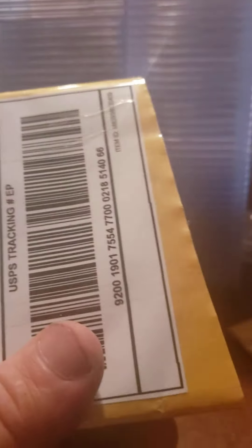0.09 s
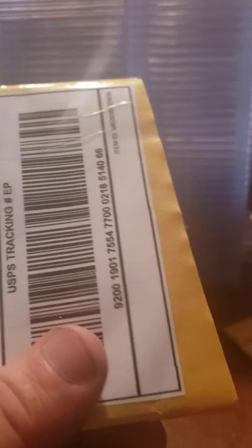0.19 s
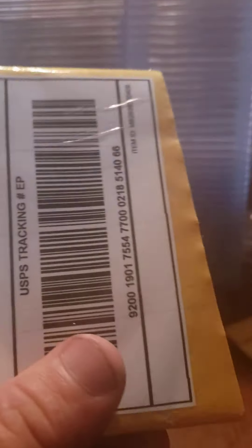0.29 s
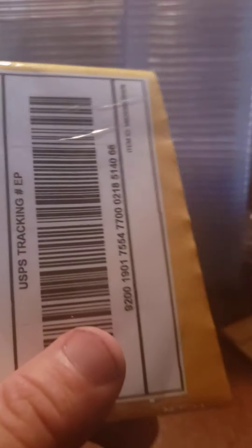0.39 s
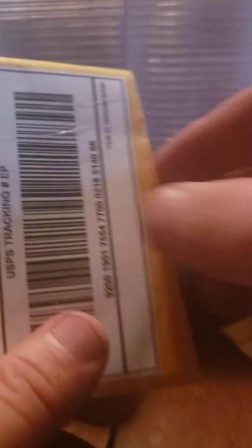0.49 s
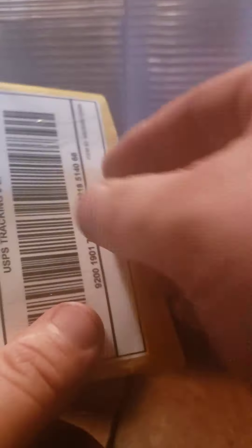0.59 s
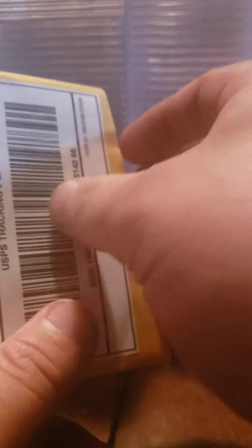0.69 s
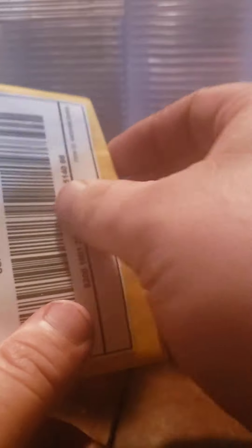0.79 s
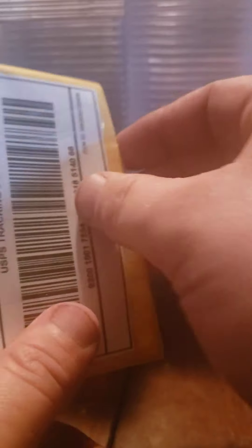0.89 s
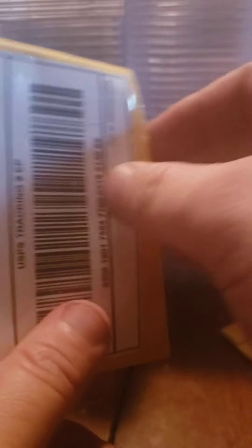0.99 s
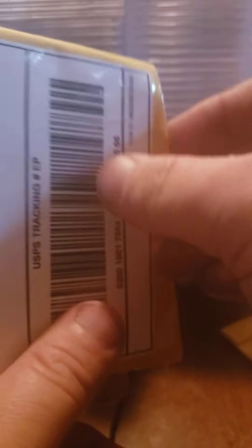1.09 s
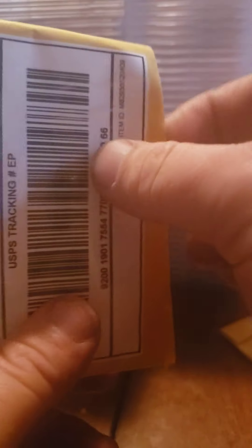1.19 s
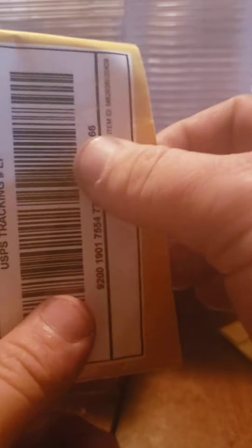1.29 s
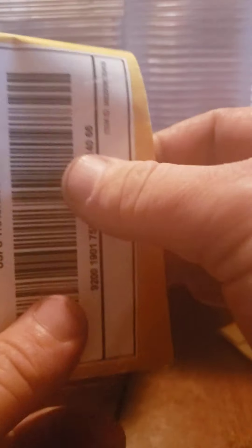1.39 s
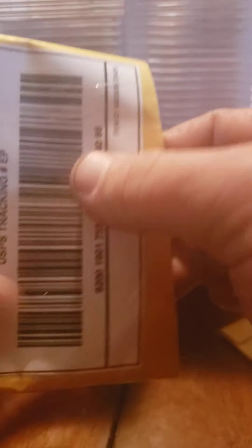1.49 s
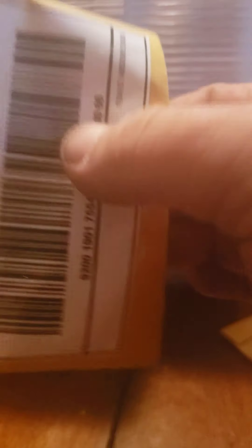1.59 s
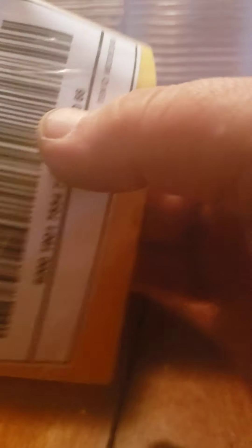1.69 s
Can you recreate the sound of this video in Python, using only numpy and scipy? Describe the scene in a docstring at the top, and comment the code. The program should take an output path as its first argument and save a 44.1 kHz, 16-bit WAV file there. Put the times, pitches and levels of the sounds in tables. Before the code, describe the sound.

Paper crinkles and ticks as hands work a padded envelope open near the microphone. Just before that, something hard is set on a table with a loud double snap and brief rattle in a quiet room.

```python
"""A padded paper envelope is pulled open by hand, close to the microphone in a small quiet room.
The paper rubs and crinkles, fibres tick, and the sheet buckles with soft low pops.
Just before, at the same close range, a hard object (perhaps the cutter) is put down on the table:
a light click, a double snap and a short rattle. Faint room tone lies behind it all."""
import sys
import numpy as np
from scipy import signal
from scipy.fft import rfft, irfft
from scipy.io import wavfile
from scipy.ndimage import uniform_filter1d

SR = 44100
rng = np.random.default_rng(int(sys.argv[2]) if len(sys.argv) > 2 else 0)


def store_wav(level_fs):
    """Save 16-bit WAV to argv[1]."""
    pcm = np.round(np.clip(np.atleast_2d(level_fs), -1, 1) * 32767)
    wavfile.write(sys.argv[1], SR, pcm.T.astype(np.int16))


N = 74970
TIME = np.arange(N) / SR
OBJECT_LAG_S, PAPER_LAG_S = .00025, -.000079  # left channel behind right: object right, paper left


def undb(db):
    """Decibels to amplitude."""
    return 10 ** (np.asarray(db) / 20)


def unit(x):
    """Scale to rms 1."""
    return x / np.sqrt(np.mean(x ** 2))


def fade(t, t60):
    """Decay by 60 dB in t60 seconds."""
    return np.exp(-np.log(1000) * t / t60)


def butter(x, hz, kind):
    """Second-order low or high pass."""
    return signal.sosfilt(signal.butter(2, hz, kind, fs=SR, output="sos"), x)


def convolve(x, response):
    """Pass x through an impulse response."""
    return signal.fftconvolve(np.atleast_2d(x), np.atleast_2d(response), axes=1)[:, :N]


def colour(x, points, tilt_db=0):
    """Causal filter of unit power through (f/Hz, level/dB) points, tilted per octave."""
    size = 4096
    octave = np.log2(np.maximum(np.arange(size // 2 + 1) * SR / size, 1))
    hz, db = np.array(points).T
    gain = unit(undb(np.interp(octave, np.log2(hz), db) + tilt_db * octave))
    cepstrum = irfft(np.log(gain))
    cepstrum[1:size // 2] *= 2  # fold to minimum phase
    cepstrum[size // 2 + 1:] = 0
    return convolve(x, irfft(np.exp(rfft(cepstrum))))


def delay(x, s):
    """Shift mono or stereo later by s seconds."""
    silence = np.zeros(x.shape[:-1] + (int(s * SR),))
    return np.concatenate([silence, x], axis=-1)[..., :N]


def stereo(x, lag_s, width):
    """Mix three signals into a shared part and one for each side; the left lags by lag_s."""
    left, right = np.sqrt(1 - width ** 2) * x[0] + width * x[1:]
    return np.array([delay(left, max(lag_s, 0)), delay(right, max(-lag_s, 0))])


def wander(rate_hz):
    """Smooth random drift of rms 1."""
    size = int(SR / rate_hz)
    return unit(uniform_filter1d(uniform_filter1d(rng.standard_normal(N), size), size))


def burst(decay_s, crack=0):
    """Three bursts of dying chatter, of unit energy and even spectrum; crack adds a sharp edge."""
    size = 2048
    chatter = rng.standard_normal((3, size)) * np.exp(-TIME[:size] / decay_s)
    chatter[:, 0] -= 2 * crack
    even = irfft(np.exp(1j * np.angle(rfft(chatter))))[:, :size // 2]
    return unit(np.pad(even, ((0, 0), (0, N - size // 2)))) / np.sqrt(N)


# Spectrum of the quiet room at the microphone: f/Hz, level/dB
ROOM_TONE = [(30, -13.5), (90, -6.5), (300, -6.5), (1000, -25.5), (4000, -25.5), (16000, -30.5)]


def room_tone():
    """Faint, steady, low noise behind the close sounds."""
    return undb(-65) * colour(stereo(rng.standard_normal((3, N)), 0, width=.52), ROOM_TONE)


def room(x, gap_s=.0016, build_s=.00076):
    """The small room's diffuse tail, different on each side; the treble dies sooner."""
    t = np.maximum(TIME - gap_s, 0)
    noise = stereo(rng.standard_normal((3, N)), 0, width=.91)
    low = butter(noise, 3500, "low") * fade(t, t60=.31)
    high = butter(noise, 3500, "high") * fade(t, t60=.28)
    tail = (low - high) * (1 - np.exp(-t / build_s))
    return convolve(x, unit(tail) / np.sqrt(N))


def contact(decay_s):
    """One hard contact, reaching the right channel first."""
    return stereo(burst(decay_s, crack=1), OBJECT_LAG_S, width=.87)


def ring(blows, modes, rise_s=.0011):
    """Decaying modes set off by the blows, a little out of step between the channels."""
    arrival = TIME - np.array([[OBJECT_LAG_S], [0]])
    tones = np.zeros((2, N))
    for hz, db, t60 in modes:
        phase = rng.uniform(0, 2 * np.pi) + rng.normal(0, .33, (2, 1))
        tones += undb(db) * np.sin(2 * np.pi * hz * arrival + phase) * fade(TIME, t60)
    return convolve(tones * (1 - np.exp(-TIME / rise_s)), blows)


def thumps(rows, lag_s, rise_s=.0014):
    """Soft blows: a few quickly damped swings of a surface, wavering in pitch."""
    direct = np.zeros(N)
    for s, db, hz, decay_s in rows:
        t = np.maximum(TIME - s, 0)
        swing = np.sin(2 * np.pi * hz * t + .5 * wander(2 * hz))
        shape = (1 - np.exp(-t / rise_s)) * np.exp(-t / decay_s)
        direct += undb(db) * butter(swing * shape / shape.max() + 1e-18, hz / 2, "high")
    return np.array([delay(direct, lag_s), direct]) + undb(-14) * room(direct)


# Click and a fainter second tick just after: t/s, relative level/dB
CLICKS = [(.134, -13), (0.1407, -22)]
# Spectrum of the click: f/Hz, level/dB
CLICK_COLOUR = [(100, -7), (500, -8), (750, -5), (1900, -8), (3200, 1), (4500, 1.5), (5000, -7),
                (16000, -19)]
# Ring of the click: f/Hz, relative level/dB, t60/s
CLICK_MODES = [(735, 0, .11), (1244, -7, .12), (1580, -4, .11), (3435, -8, .16)]


def click():
    """The object touches down near the microphone: a light, hollow click, a fainter tick just after, a short
    ring."""
    direct, blows = np.zeros((2, N)), np.zeros(N)
    for s, db in CLICKS:
        direct += undb(db) * delay(contact(decay_s=.0014), s)
        blows[int(s * SR)] += undb(db)
    hits = colour(direct + undb(-12) * room(blows), CLICK_COLOUR)
    return undb(7) * (hits + undb(-36) * ring(blows, CLICK_MODES))


# Landing contacts: t/s, relative level/dB, tilt/(dB/octave), chatter decay/s, ring and room send/dB
SNAPS = [(.2412, -9.5, 1.5, .002, -12), (.252, -4, -1.5, 0.0014, -1), (.2532, 0, 3, 0.002, -15)]
# Rattling to rest: t/s, relative level/dB, tilt/(dB/octave)
RATTLE = [(.2782, -16, .6), (.2805, -17, 0), (.2963, -18.5, .6), (.3153, -16.5, 1.5), (.3288, -19, .3)]
# Spectrum of a contact, heard close: f/Hz, level/dB
SNAP_COLOUR = [(100, -20.5), (490, -22.5), (700, 1.5), (1100, -4.5), (1800, 3.5), (2700, -0.5), (3400, -8),
               (4300, -5), (5600, -4), (8000, -17), (12500, -15), (16000, -21)]
# Spectrum of the room's answer: f/Hz, level/dB
ROOM_COLOUR = [(80, -10), (180, -13.5), (480, -6), (720, -6), (1150, -7.5), (1700, -4), (3400, -10.5),
               (12500, -22.5), (16000, -32.5)]
# Ring of object and table: f/Hz, relative level/dB, t60/s
TABLE_MODES = [(636, 7, .28), (750, 5, .14), (890, 4, .26), (1107, 2, .26), (1381, 3, .28), (1573, 3, .2),
               (1670, 9, .13), (1788, 3, .26), (2197, 2, .22), (2608, 4, .22)]


def snap_and_rattle():
    """The object lands: each contact cracks, rings the object and the table, and fills the room."""
    direct, blows = np.zeros((2, N)), np.zeros(N)
    rattle = [(*row, .0016, -18) for row in RATTLE]  # all share one decay and send
    for s, db, tilt_db, decay_s, send_db in list(SNAPS) + rattle:
        direct += undb(db) * delay(colour(contact(decay_s), SNAP_COLOUR, tilt_db), s)
        blows[int(s * SR)] += undb(db + send_db)
    return undb(11) * (direct + undb(-43) * ring(blows, TABLE_MODES) + room(colour(blows, ROOM_COLOUR)))


# Knocks on the table: t/s, relative level/dB, f/Hz, decay/s
KNOCKS = [(.3006, -20, 780, .0025), (.3095, -28, 750, .002), (.336, -28, 1100, .002)]


def knocks():
    """The object settles with dull knocks."""
    return undb(.5) * thumps(KNOCKS, OBJECT_LAG_S)


# Pops of the envelope: t/s, relative level/dB, f/Hz, decay/s
POPS = [(.002, -50, 730, .008), (.036, -46, 730, .009), (.63, -50, 250, .003), (.96, -43, 880, .004),
        (1.0055, -39, 900, .005), (1.073, -33, 370, .006), (1.0795, -29, 760, .002), (1.08, -34, 120, .007),
        (1.3245, -32, 720, .004), (1.328, -40, 50, .03), (1.396, -35, 600, .003), (1.49, -36, 760, .004),
        (1.525, -38, 780, .002), (1.532, -37, 640, .002), (1.6132, -31, 260, .003), (1.648, -42, 78, .025)]


def buckling():
    """The sheet buckles with soft low pops, centred in front of the microphone."""
    return undb(-1.5) * thumps(POPS, lag_s=0)


def fibre_slips(width, slips_per_s=4500, spread_db=1.6, flutter_db=2.6):
    """Dense tiny slips of paper fibres, mostly faint and a few strong, coming in flurries."""
    present = rng.random(N) < slips_per_s / SR
    strength = undb(spread_db * np.minimum(rng.exponential(size=N), 5))
    slips = rng.standard_normal((3, N)) * present * strength
    flurries = undb(flutter_db * wander(120))
    return stereo(unit(slips * flurries), PAPER_LAG_S, width)


def stroke(peak_s, rise_s, fall_s):
    """Speed of the sliding paper: a smooth swell and release."""
    t = TIME - peak_s
    return np.exp(-(t / np.where(t < 0, rise_s, fall_s)) ** 2)


# Rubbing and tearing: peak t/s, rise/s, fall/s, then relative level/dB of crinkle, sheet and creak
STROKES = [(0.04, 0.025, 0.015, -51.5, -75.5, -51.5), (0.599, 0.043, 0.049, -62.5, -70.5, -85),
           (0.742, 0.02, 0.021, -56.5, -60, -61), (0.859, 0.075, 0.024, -58, -68.5, -59.5),
           (0.961, 0.024, 0.012, -55, -62, -48.5), (1.021, 0.027, 0.044, -48.5, -53.5, -49.5),
           (1.077, 0.016, 0.0043, -48, -47.5, -41.5), (1.15, 0.03, 0.21, -60.5, -62, -65.5),
           (1.364, 0.07, 0.064, -46, -48, -44), (1.49, 0.024, 0.019, -51.5, -52.5, -44),
           (1.528, 0.013, .02, -53.5, -49.5, -44.5), (1.666, 0.088, .08, -49, -53.5, -50)]
# Single fibres and creases giving way: t/s, relative level/dB
TICKS = [(.0425, -23), (.758, -29), (.851, -23), (.9635, -26), (1.0085, -23), (1.021, -21), (1.073, -19),
         (1.0795, -13), (1.1175, -21), (1.157, -26), (1.2035, -25), (1.2575, -23), (1.264, -25),
         (1.3605, -17), (1.412, -19), (1.4915, -15), (1.5255, -18), (1.5325, -18), (1.5825, -15),
         (1.607, -17)]
# Spectrum of stiff paper creaking as it bends: f/Hz, level/dB
CREAK_COLOUR = [(200, -40.5), (550, -2), (780, -2), (980, -2.5), (1220, -10.5), (1520, -4), (2300, -6.5),
                (6000, -35)]
# Spectrum of the crinkle, heard close: f/Hz, level/dB
CRINKLE_COLOUR = [(500, -27), (1200, -12.5), (2150, -4), (2950, 2.5), (4300, -0.5), (5900, -1.5),
                  (7200, -1), (9000, -6.5), (11500, -3.5), (16000, -7)]
# Spectrum of the sheet's body: f/Hz, level/dB
SHEET_COLOUR = [(25, -10.5), (50, 3.5), (330, 4), (500, -6), (750, -2.5), (1000, -16.5), (2500, -26.5),
                (8000, -25)]


def envelope(left_lead_db=2.5):
    """Close up and a little left, rubbing and tearing excite crinkle, creak and body; creases tick."""
    power = np.zeros((3, N))
    for peak_s, rise_s, fall_s, *levels_db in STROKES:
        power += (undb(levels_db)[:, None] * stroke(peak_s, rise_s, fall_s)) ** 2
    bright, body, bend = np.sqrt(power)
    creak = undb(-3) * colour(fibre_slips(width=.94) * bend, CREAK_COLOUR)
    crinkle = undb(2) * colour(fibre_slips(width=.99) * bright, CRINKLE_COLOUR)
    sheet = undb(2.5) * colour(fibre_slips(width=.25) * body, SHEET_COLOUR)
    ticks = np.zeros((2, N))
    for s, db in TICKS:
        tick = stereo(burst(decay_s=.0022), PAPER_LAG_S, width=.99)
        ticks += undb(db - 4.5) * delay(tick, s)
    paper = crinkle + creak + sheet + colour(ticks, CRINKLE_COLOUR, tilt_db=1.5)
    pan = undb([[left_lead_db / 2], [-left_lead_db / 2]])
    return paper * pan + undb(-7.5) * room(paper)


def scene():
    """At the microphone: the object is put down, then the envelope is opened, over room tone."""
    hard_object = click() + snap_and_rattle() + knocks()
    return hard_object + envelope() + buckling() + room_tone()


def record(dry, bass_hz=30, top_hz=16000):
    """The recorder drops the deepest bass, clips at full scale and cuts the top."""
    clipped = np.clip(butter(dry, bass_hz, "high"), -1, 1)
    return signal.sosfilt(signal.ellip(10, .2, 80, top_hz, fs=SR, output="sos"), clipped)


dry = scene()
out = record(dry)
store_wav(out)
```